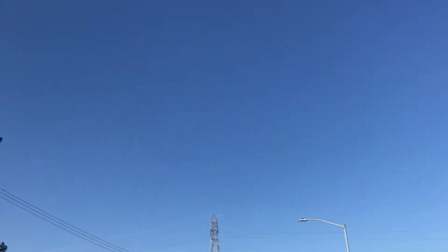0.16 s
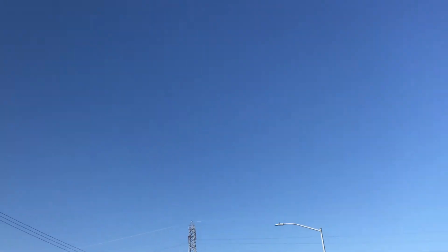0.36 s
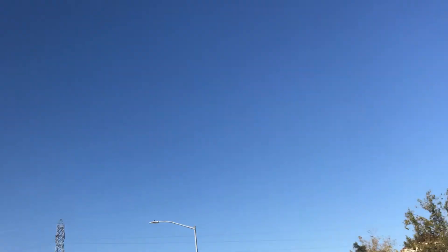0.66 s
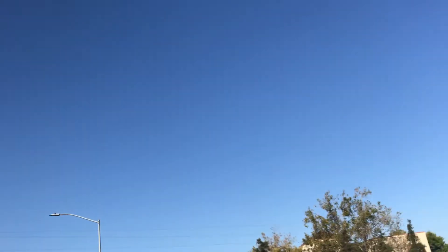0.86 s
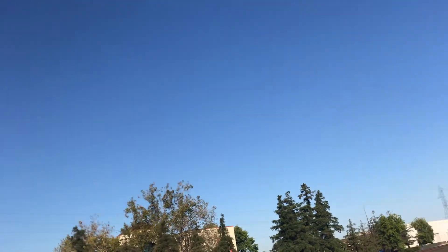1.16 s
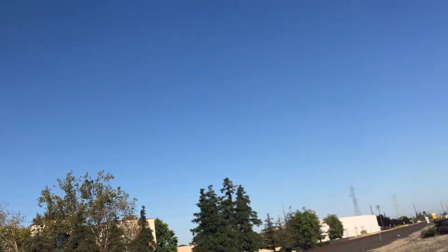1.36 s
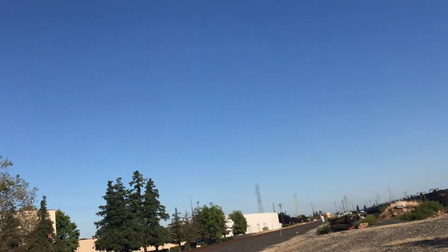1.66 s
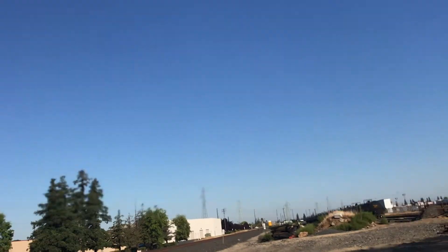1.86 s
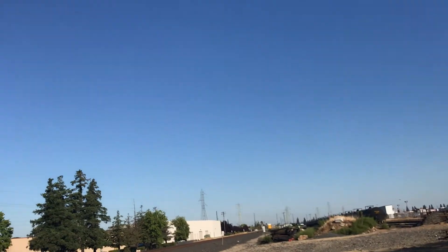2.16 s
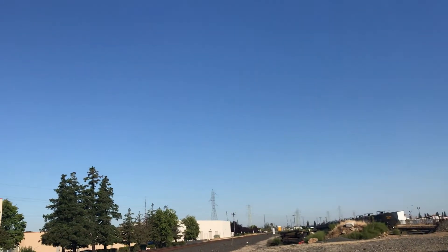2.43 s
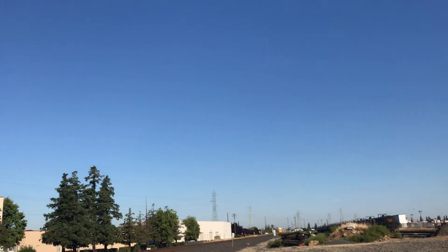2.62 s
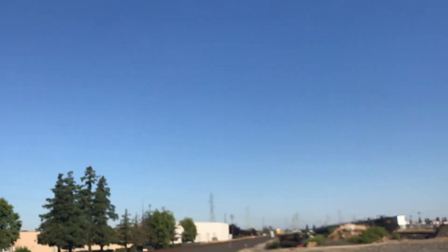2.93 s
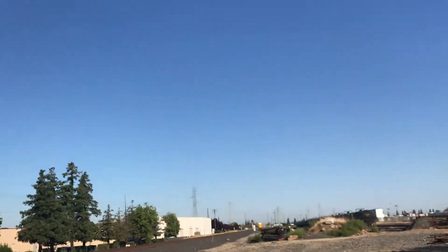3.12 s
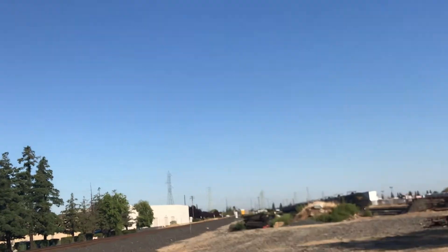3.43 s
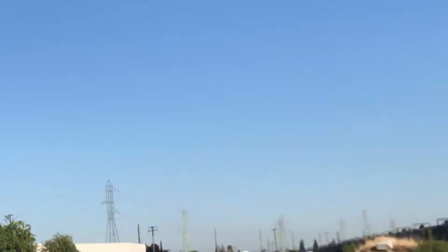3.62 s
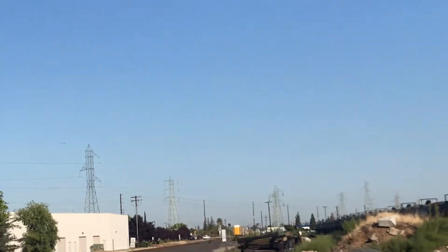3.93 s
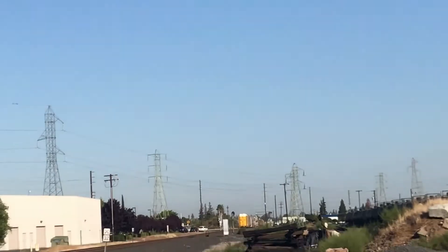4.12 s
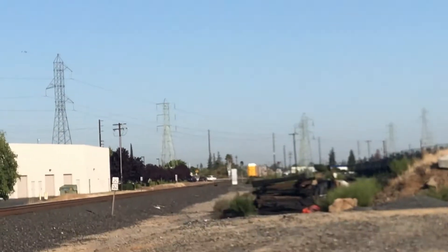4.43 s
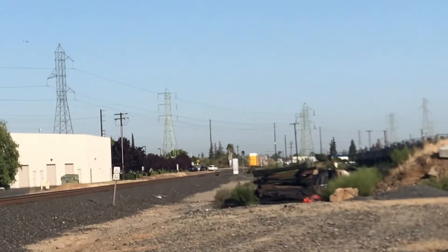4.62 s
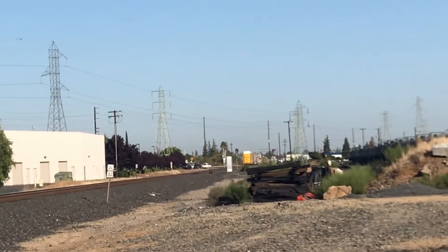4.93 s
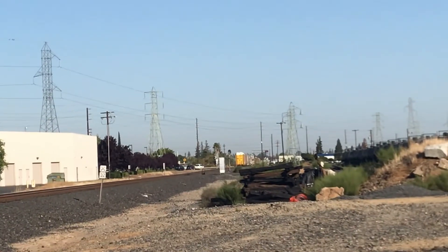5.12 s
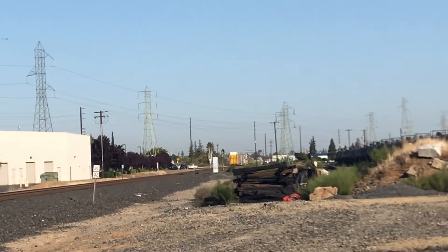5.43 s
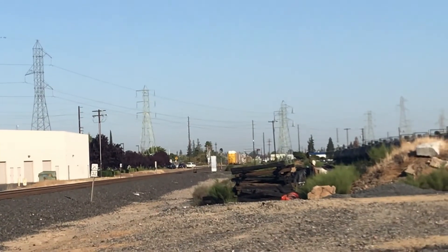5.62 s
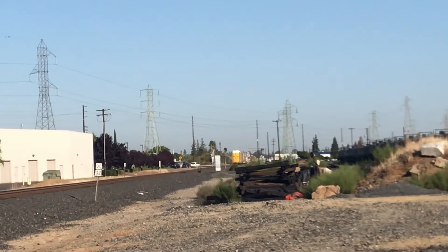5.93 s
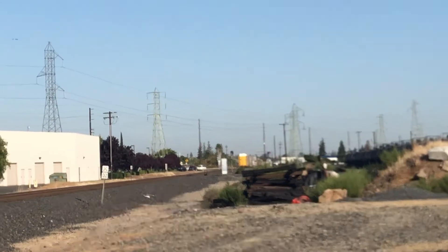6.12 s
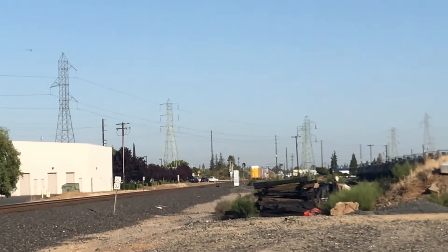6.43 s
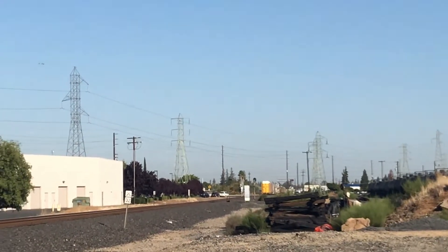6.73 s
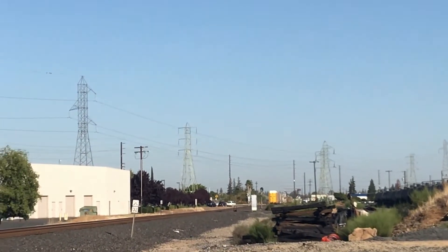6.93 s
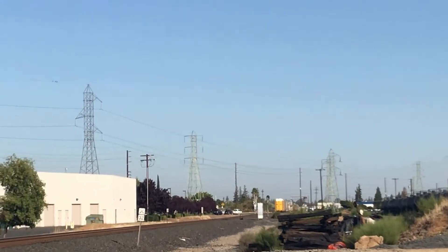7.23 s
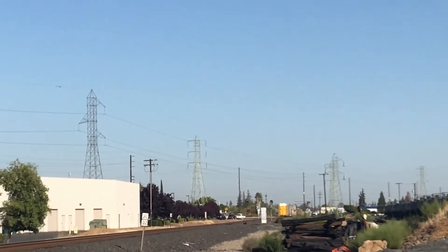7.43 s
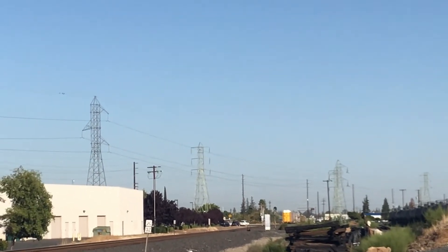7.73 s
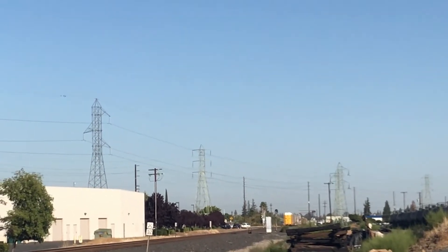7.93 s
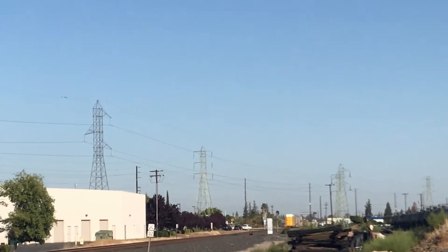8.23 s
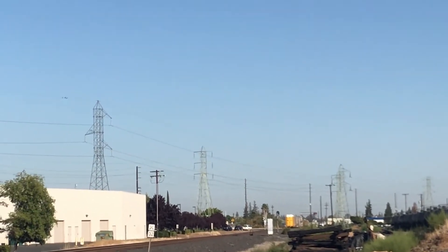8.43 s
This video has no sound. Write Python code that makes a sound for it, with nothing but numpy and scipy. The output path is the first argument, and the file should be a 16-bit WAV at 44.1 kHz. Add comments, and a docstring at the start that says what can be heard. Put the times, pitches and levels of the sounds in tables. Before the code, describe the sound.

Busy road at a rail crossing, outdoors, through a phone at some distance. A deep rumble with soft tyre roar runs throughout. In the first second, bright hiss of passing vehicles, a car revving up and dropping at a gear change, a thin sinking turbine whine, tiny belt chirps and a dry tick. A truck pulls away, its buzzy growl strongest around 1-2.5 s and climbing until about 3 s; a van also gathers speed, then lifts off around 3 s. A coasting car falls in pitch from 3 to 4 s while another engine hums. Around 4.2 s wheels bump dully over rails; from 4.4 to 5.5 s faint, very high brake squeals and chirps. A pickup slows near 6 s amid metallic clinks, another bump and gritty rattles, then pulls off, humming upward from 6.5 s to the end, with softer bumps near 7 and 7.5 s and faint clinks after 8 s.

```python
"""Traffic at a level crossing

Busy road some way off, heard through a phone: six engines rev, change gear, coast or wait, as wandering shaft orders.
Rumble, tyre roar and hiss are noise in third-octave bands that swell as vehicles go by. Turbine, belt and brakes
squeal as unsteady carriers; loose metal clinks and wheels bump over the rails as struck modes.
Dry ticks and short rustles are bursts of band noise."""
import sys
import numpy as np
from scipy import signal
from scipy.fft import rfft, irfft, next_fast_len
from scipy.io import wavfile
from scipy.ndimage import uniform_filter1d

SR = 44100
rng = np.random.default_rng(int(sys.argv[2]) if len(sys.argv) > 2 else 0)


def log_audio(samples):
    """Write samples as a 16-bit WAV file to the path given in sys.argv[1]."""
    # one column per channel
    frames = np.atleast_2d(samples).T
    # limit to full scale, then quantise
    limited = np.clip(frames, -1, 1)
    pcm = np.round(limited * 32767).astype(np.int16)
    wavfile.write(sys.argv[1], SR, pcm)


N = 377937

# single order of the distant engines: multiple, level column, offset/dB, offset per revving rate/(dB per Hz/s)
ONE_ORDER = [(0.99, 0, 0, 0)]


def undb(db):
    """Decibels to gain."""
    return 10 ** (np.asarray(db) / 20)


def curves(table, fade_s=0.04):
    """Table columns at every sample, and a gate open while the table lasts."""
    knots_s, *columns = np.transpose(table)
    t_s = np.arange(N) / SR
    edge = np.minimum(t_s - knots_s[0], knots_s[-1] - t_s) / fade_s
    gate = np.clip(edge + (knots_s[0] <= 0) + (knots_s[-1] >= t_s[-1]), 0, 1)
    return [np.interp(t_s, knots_s, c) for c in columns], gate


def walk(rate_hz, n=N):
    """Random levels held 1 / rate_hz and slewed twice; spread near 1."""
    hold = max(int(SR / rate_hz), 1)
    steps = np.repeat(rng.standard_normal(n // hold + 1), hold)
    return 1.48 * uniform_filter1d(uniform_filter1d(steps, hold), hold)[:n]


def band(lo_hz, hi_hz, n=N):
    """Band-passed noise of rms 1."""
    sos = signal.butter(2, [lo_hz, min(hi_hz, 0.45 * SR)], "band", fs=SR, output="sos")
    noise = signal.sosfilt(sos, rng.standard_normal(n))
    return noise / np.std(noise)


def add(out, start_s, sound):
    """Mix a sound in from start_s."""
    i = int(start_s * SR)
    out[i:i + len(sound)] += sound[:N - i]


def ring(hz, t60_s):
    """One struck mode: a sine decaying 60 dB in t60_s."""
    t_s = np.arange(int(t60_s * SR)) / SR
    return np.sin(2 * np.pi * hz * t_s) * np.exp(-np.log(1000) * t_s / t60_s)


def squeal(hz, db, width_hz):
    """Stick-slip never settles on one tone: a carrier whose size and phase wander at random."""
    n = len(hz)
    wander = 0.59 + walk(2 * width_hz, n) + 1j * walk(2 * width_hz, n)
    carrier = np.exp(2j * np.pi * np.cumsum(hz) / SR)
    return undb(db) * (wander * carrier).real


def engine(table, orders, pipe=()):
    """Exhaust orders locked to one wobbling shaft; higher orders fade more on the way through the air."""
    wobble, uneven_db = 0.0035, 1.25
    pull_lag_s, pull_spread_s = 0.16, 0.32  # exhaust stays harsh a moment after revving up
    (hz, *dbs), gate = curves(table, fade_s=0.19)
    rise_hz_per_s = uniform_filter1d(np.gradient(hz) * SR, int(pull_spread_s * SR))
    i = np.arange(N)
    pull_hz_per_s = np.interp(i - pull_lag_s * SR, i, rise_hz_per_s)
    turns = np.cumsum(hz * (1 + wobble * walk(12))) / SR
    out = np.zeros(N)
    for multiple, column, offset_db, pull_db in orders:
        level_db = dbs[column] + offset_db + pull_db * pull_hz_per_s
        for centre_hz, half_width_hz, top_db in pipe:
            level_db = level_db + top_db / (1 + ((multiple * hz - centre_hz) / half_width_hz) ** 2)
        level_db = level_db + uneven_db * np.cbrt(multiple) * walk(11)
        out += np.sqrt(2) * undb(level_db) * np.sin(2 * np.pi * (multiple * turns + rng.random()))
    return gate * out


def road():
    """Tyre and engine noise in third-octave bands, lifted by passing vehicles; each band flickers."""
    # spectrum: f/Hz, relative density/dB
    colour_table = [(22, -32), (40, -9), (65, 1), (130, -2.5), (220, -7), (360, -14), (490, -20),
                    (1000, -22), (1700, -30.5), (2800, -37.5), (4000, -39.5), (7000, -48), (10000, -57.5),
                    (15600, -71.5)]
    # passing vehicles: nearest at t/s, half-power time/s, lift/dB, centre f/Hz
    passes = [(0, 0.42, 8.5, 453), (0, 0.37, 15, 3760), (.33, 0.43, 17.5, 14000), (.83, 0.25, 16, 2360),
              (1.97, .63, 8.5, 3670), (2.12, .32, 6.5, 300), (3.2, 0.35, 1.5, 370), (4.2, 0.55, 2.5, 200),
              (4.45, 0.62, 8, 3847), (5.1, 0.5, 5.5, 11880), (5.96, .24, 3, 2860), (6.05, 0.31, 2, 152),
              (6.88, 0.38, 4, 497), (7., 0.32, 1.5, 100), (7.08, 0.63, 8.5, 3960), (8.1, 0.89, 2.5, 600),
              (8.57, 0.6, 9, 3220)]
    spread_octaves, last_third_db = 1.25, -24.5
    t_s = np.arange(N) / SR
    size = next_fast_len(N)
    octave = np.log2(np.maximum(np.arange(size // 2 + 1) * SR / size, 1))
    colour_hz, colour_db = np.array(colour_table).T
    colour = undb(np.interp(octave, np.log2(colour_hz), colour_db))
    spectrum = rfft(rng.standard_normal(size)) * colour
    # power goes as 1 / distance squared
    nearness = np.array([undb(2 * db) / (1 + ((t_s - s) / half_s) ** 2) for s, half_s, db, _ in passes])
    pass_octave = np.log2(np.array(passes)[:, -1])
    out, shared = 0, walk(5.5)
    for centre in np.arange(13, 43) / 3:  # octaves above 1 Hz
        window = np.cos(np.pi / 2 * np.clip(3 * (octave - centre), -1, 1)) ** 2
        share = np.exp(-((centre - pass_octave) / spread_octaves) ** 2)
        lift = np.sqrt(1 + share @ nearness)
        lift = lift / lift[-N // 3:].mean()
        bright = np.clip((centre - 7.5) / 7.2, 0, 1)  # treble comes in puffs, bass is steadier
        flicker_db = bright * shared + walk(11)
        out = out + irfft(spectrum * window, size)[:N] * lift * undb(flicker_db)
    return out * undb(last_third_db) / np.std(out[-N // 3:])


def truck():
    """Truck pulling away; exhaust resonances lift orders passing through them."""
    # course: t/s, firing rate f/Hz, lowest order level/dB, upper orders level/dB (before offsets)
    course = [(0, 87.5, -26, -50), (.7, 89.5, -22.5, -33.5), (1.15, 94, -14.5, -25), (1.35, 97, -28, -27),
              (1.6, 100.6, -19, -26.5), (1.85, 103.5, -23, -27.5), (2.3, 108.7, -17, -29),
              (2.6, 111.6, -18.5, -39), (2.8, 114.9, -14, -45), (3.05, 119.2, -23, -42),
              (4.05, 118.6, -27, -52), (4.7, 124.1, -29, -48), (5.2, 104.9, -38, -53)]
    # orders: multiple, level column, offset/dB, offset per revving rate/(dB per Hz/s)
    orders = [(1, 0, -0.5, 0), (2, 1, 0, 0), (3, 1, -6.5, 0), (4, 1, -10.5, 0), (5, 1, -18., 0),
              (7, 1, -21.5, 0), (8, 1, -28, 0)]
    # exhaust resonances: f/Hz, half-width/Hz, lift/dB
    pipe = [(448, 29, 7.5), (754, 16, 6)]
    return engine(course, orders, pipe)


def car():
    """Car that revs, then shifts up: multiples of its shaft rate."""
    # course: t/s, shaft rate f/Hz, level/dB (before offsets)
    course = [(0, 33.25, -22.5), (.3, 38.38, -17), (.55, 40.86, -17.5), (.72, 39.08, -20), (.9, 33.3, -18),
              (1.1, 30.74, -36), (1.5, 30.4, -37), (1.95, 31.57, -30.5), (2.7, 27.76, -33)]
    # orders: multiple, level column, offset/dB, offset per revving rate/(dB per Hz/s)
    orders = [(2, 0, -1.5, 0), (3, 0, -3, 0), (5, 0, -21, 0.0043)]
    return engine(course, orders)


def van():
    """Van that gathers speed, then lifts off: firing rate and its third order."""
    # course: t/s, firing rate f/Hz, lowest order level/dB, 3rd order level/dB (before offsets)
    course = [(0, 76.7, -29.5, -40), (.7, 77.77, -22, -34.5), (1.5, 79.7, -23.5, -34.5),
              (2, 81.9, -19, -40.5), (2.5, 83.44, -27, -27), (2.85, 84, -22.5, -24),
              (3.1, 81.1, -16.5, -25), (3.5, 69.33, -27, -30), (4.4, 64.5, -29, -34), (4.7, 60.4, -42, -50)]
    # orders: multiple, level column, offset/dB, offset per revving rate/(dB per Hz/s)
    orders = [(1, 0, 0, 0.0058), (3, 1, 0.0047, 0)]
    return engine(course, orders)


def turbine():
    """Truck's turbine whine: a narrow hiss that sinks as the truck draws away."""
    # course: t/s, level/dB
    course = [(0, -58), (.4, -56), (.8, -64), (1.3, -77), (1.6, -63), (1.9, -63), (2.3, -84)]
    start_hz, sink_hz_per_s = 11140, 800
    (db,), gate = curves(course)
    hz = start_hz - sink_hz_per_s * np.arange(N) / SR
    return gate * squeal(hz, db + 0.81 * walk(12.7), width_hz=380)


def squeal_burst(length_s, first_hz, droop_hz, db, width_hz):
    """One stick-slip burst: drooping, jittering pitch and uneven level under soft ends."""
    n = int(length_s * SR)
    hz = first_hz - np.linspace(0, droop_hz, n) + 0.25 * width_hz * walk(31.2, n)
    return signal.windows.tukey(n, 0.4) * squeal(hz, db + 1.8 * walk(23, n), width_hz)


def belt():
    """Slipping belt: narrow chirps without droop."""
    # chirps: start t/s, length/s, f/Hz, level/dB
    chirps = [(0.096, 0.12, 8660, -52), (0.305, 0.22, 8560, -51.5), (0.982, .098, 8500, -46.5),
              (1.258, 0.15, 8735, -62), (1.689, 0.28, 8500, -62), (1.949, 0.16, 8567, -62),
              (2.449, 0.09, 8475, -63), (3.448, 0.29, 8500, -66), (4.09, .15, 8470, -63),
              (4.237, .76, 8520, -73), (7.75, .13, 8510, -67)]
    out = np.zeros(N)
    for start_s, length_s, hz, db in chirps:
        add(out, start_s, squeal_burst(length_s, hz, 0, db, width_hz=60))
    return out


def ticks():
    """Dry ticks: band noise with a quick rise and decay."""
    # ticks: t/s, level/dB (noise rms before the envelope)
    hits = [(0.4761, -32), (1.8522, -48), (1.8746, -41.5), (1.8871, -37.5), (2.899, -48), (3.6716, -50),
            (5.5541, -43), (7.9688, -48)]
    out = np.zeros(N)
    t_s = np.arange(SR // 50) / SR
    envelope = np.minimum(t_s / 0.0015, 1) * np.exp(-t_s / 0.0028)
    for start_s, db in hits:
        add(out, start_s, undb(db) * band(3000, 13000, len(t_s)) * envelope)
    return out


def rustles():
    """Grit and rattle: short humps of uneven band noise."""
    # rustles: centre t/s, half of full length/s, centre f/Hz, level/dB (noise rms before the envelope)
    bursts = [(0.913, 0.03, 1640, -38), (3.503, 0.07, 3603, -49.5), (4.149, .08, 4490, -56),
              (4.865, 0.12, 5470, -52.5), (5.262, .13, 7070, -52), (6.044, 0.033, 1300, -37.5),
              (6.459, 0.032, 2500, -45.5), (6.824, 0.046, 3000, -44), (7.38, 0.074, 3480, -48.5)]
    out = np.zeros(N)
    for centre_s, half_s, hz, db in bursts:
        n = int(2 * half_s * SR)
        gain = undb(db + 3.1 * walk(60.5, n)) * np.hanning(n)
        add(out, centre_s - half_s, gain * band(hz / 1.8, 1.36 * hz, n))
    return out


def brakes():
    """Brakes and running gear: stick-slip squeals, and a cluster of short high chirps."""
    # squeals: start t/s, length/s, first f/Hz, droop/Hz, level/dB
    bursts = [(1.29, 0.1995, 2720, 12, -53), (1.54, .13, 1100, -5, -43), (1.649, 0.087, 2720, 10, -57),
              (2.165, .225, 14800, 202, -64), (4.448, .43, 14050, 152, -72), (4.59, .32, 11540, 72, -50.5),
              (4.878, 0.097, 11400, 252, -57.5), (4.92, .32, 10620, 120, -63.5),
              (4.901, 0.376, 13350, -150, -61), (5.26, .06, 14850, 247, -59),
              (5.274, 0.17, 14100, 350, -64), (5.299, .18, 11950, 350, -65)]
    # chirp cluster: start t/s, end t/s, lowest f/Hz, highest f/Hz
    cluster = (4.43, 5.46, 11800, 15400)
    out = np.zeros(N)
    for start_s, length_s, first_hz, droop_hz, db in bursts:
        width_hz = 0.007 * first_hz + 0.45 * abs(droop_hz)
        add(out, start_s, squeal_burst(length_s, first_hz, droop_hz, db, width_hz))
    start_s, end_s, lo_hz, hi_hz = cluster
    for when, pitch, length, size in rng.random((80, 4)):
        n = int((0.05 + 0.13 * length) * SR)
        # the shoe lets go, the note droops
        hz = (lo_hz + (hi_hz - lo_hz) * pitch) * np.linspace(1, 0.99, n)
        chirp = np.hanning(n) * squeal(hz, -76 + 7.3 * size, width_hz=230)
        add(out, start_s + (end_s - start_s - n / SR) * when, chirp)
    return out


def coasting_car():
    """Car coasting down: one falling order."""
    # course: t/s, firing rate f/Hz (before the order multiple), level/dB
    course = [(3.1, 109.8, -27.5), (3.85, 83.4, -26)]
    return engine(course, ONE_ORDER)


def waiting_engine():
    """Engine waiting further off: one order of changing rate."""
    # course: t/s, firing rate f/Hz (before the order multiple), level/dB
    course = [(3.3, 79.5, -25.5), (4.2, 80.9, -26.5), (5.1, 79.32, -27.5), (5.5, 74.1, -34),
              (5.9, 82.3, -25), (6.3, 74.86, -31), (7.3, 74.2, -40)]
    return engine(course, ONE_ORDER)


def rail_bumps():
    """Trailer wheels bumping over the rails: a brief push rings damped modes."""
    # bumps: t/s, level/dB (before mode levels)
    bumps = [(4.162, -16.5), (4.186, -17), (5.95, -22), (6.9, -26), (7.53, -27.5)]
    # modes: f/Hz, relative level/dB, t60/s
    modes = [(109.5, 7.5, 0.33), (173.4, 1, 0.15), (226, -8, .1), (381, -4.5, 0.081), (561, -9.5, 0.094),
             (720, -5, 0.081)]
    out = np.zeros(N)
    push = np.hanning(int(0.0017 * SR))
    push = push / push.sum()
    for start_s, db in bumps:
        for hz, mode_db, t60_s in modes:
            add(out, start_s, undb(db + mode_db) * np.convolve(ring(hz, t60_s), push))
    return out


def clinks():
    """Loose metal: three close modes struck together."""
    # clinks: t/s, main mode f/Hz, main mode level/dB (before decay)
    hits = [(4.383, 4350, -45), (5.73, 9400, -55), (5.81, 8000, -49), (5.885, 7900, -50),
            (6.028, 3310, -33.5), (6.06, 3200, -38), (6.268, 5500, -45), (6.45, 2210, -40),
            (6.46, 7900, -46), (6.55, 3960, -38.5), (6.905, 3170, -42), (8.07, 7980, -47),
            (8.19, 8300, -48)]
    t60_s, rise_s = 0.087, 0.0014
    out = np.zeros(N)
    for start_s, hz, db in hits:
        modes = ring(hz, t60_s) + 0.41 * ring(hz + 170, t60_s) + 0.67 * ring(hz - 230, t60_s)
        rise = np.minimum(np.arange(len(modes)) / (rise_s * SR), 1)
        add(out, start_s, undb(db) * modes * rise)
    return out


def pickup():
    """Pickup that slows for the rails and pulls off again: whole and half orders."""
    # course: t/s, firing rate f/Hz, lowest order level/dB, 3rd order level/dB (before offsets)
    course = [(4.7, 56.6, -46, -34), (5.3, 51, -39, -28), (6.05, 48.91, -34, -37), (6.4, 53.54, -36, -27.5),
              (6.62, 54.96, -44, -29.5), (6.8, 61.37, -40, -30), (7.3, 59.9, -27.5, -26.5),
              (7.7, 60.93, -29, -31.5), (8.1, 62.56, -24.5, -31), (8.57, 65.53, -27, -29)]
    # orders: multiple, level column, offset/dB, offset per revving rate/(dB per Hz/s)
    orders = [(1, 0, -0.5, 0.095), (3, 1, 0, 0.0091), (4.5, 1, -17.5, 0.58), (6, 1, -14, 0.32),
              (7.5, 1, -25.5, 0.32), (9, 1, -22.5, 0.14)]
    return engine(course, orders)


def scene():
    """All sources at the microphone."""
    engines = truck() + car() + van() + coasting_car() + waiting_engine() + pickup()
    squeals = turbine() + belt() + brakes()
    small_sounds = ticks() + rustles() + rail_bumps() + clinks()
    return (road() + engines + squeals + small_sounds)[None]


def record(dry):
    """The phone's sound port takes out a few narrow bands; the phone cuts the top."""
    # port dips: f/Hz, width/Hz, depth 0-1
    port_dips = [(4930, 380, 0.35), (7440, 530, 0.2)]
    top_hz = 15650
    for hz, width_hz, depth in port_dips:
        dry = dry - depth * signal.lfilter(*signal.iirpeak(hz, hz / width_hz, fs=SR), dry)
    return signal.sosfilt(signal.ellip(10, 0.2, 70, top_hz, fs=SR, output="sos"), dry)


dry = scene()
out = record(dry)
log_audio(out)
```